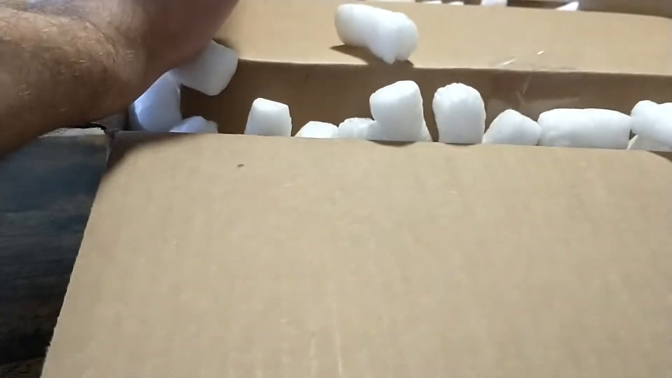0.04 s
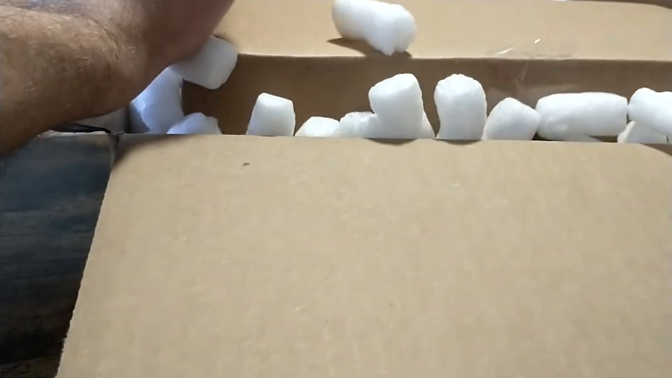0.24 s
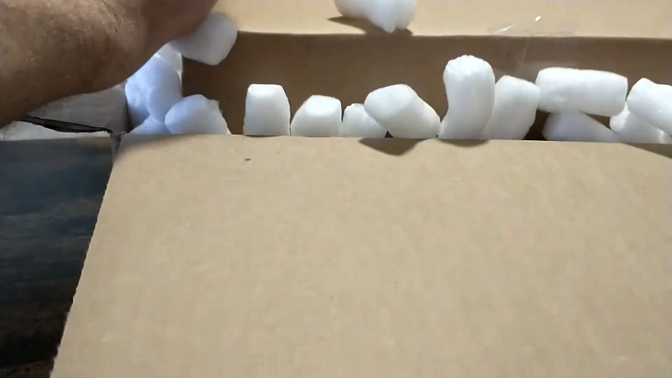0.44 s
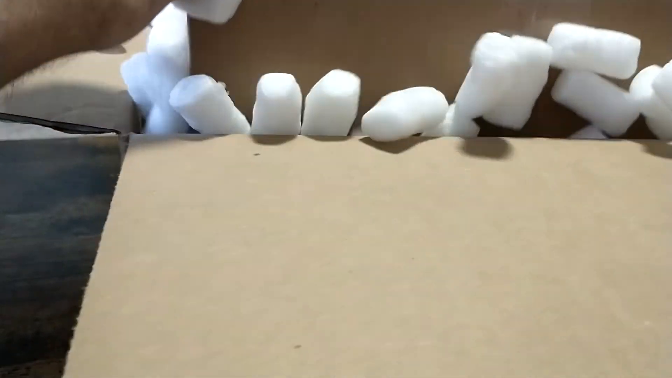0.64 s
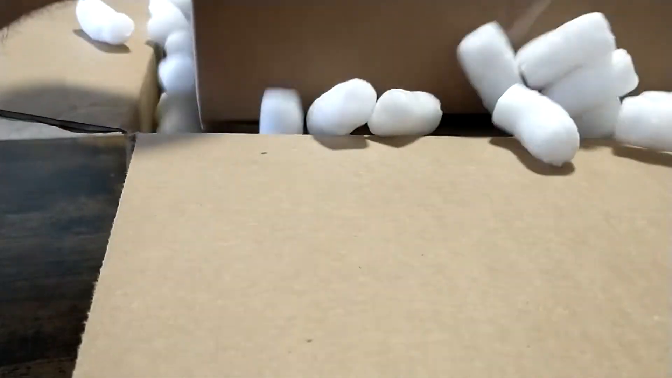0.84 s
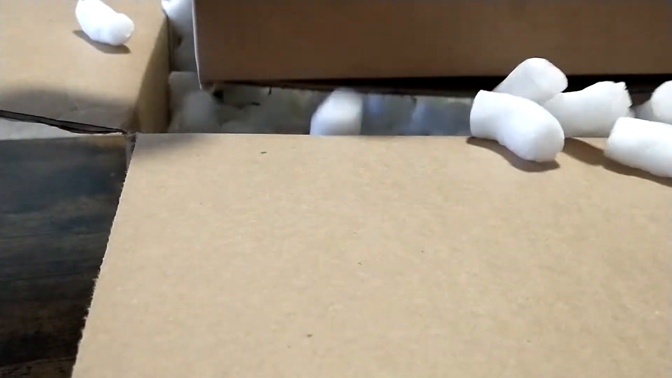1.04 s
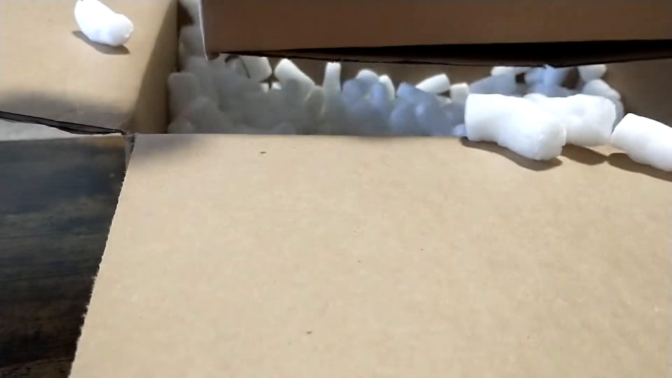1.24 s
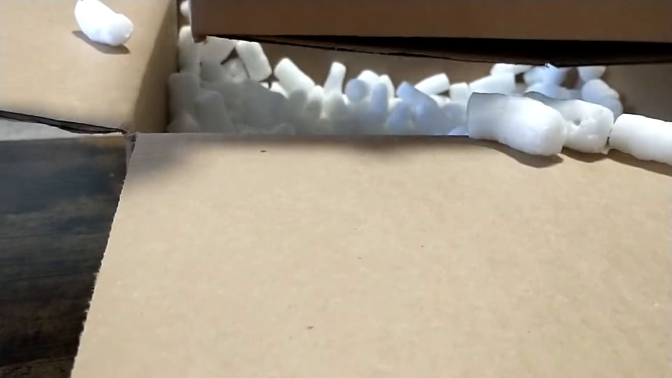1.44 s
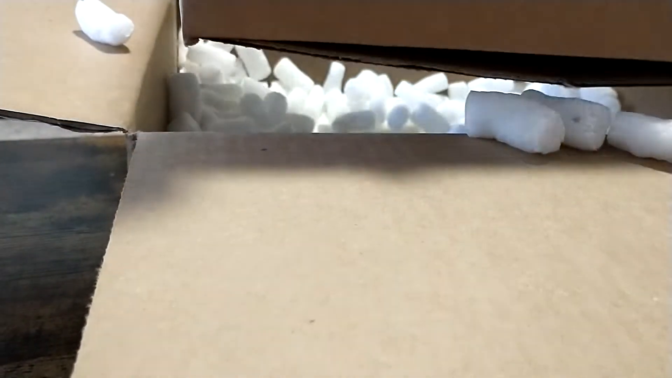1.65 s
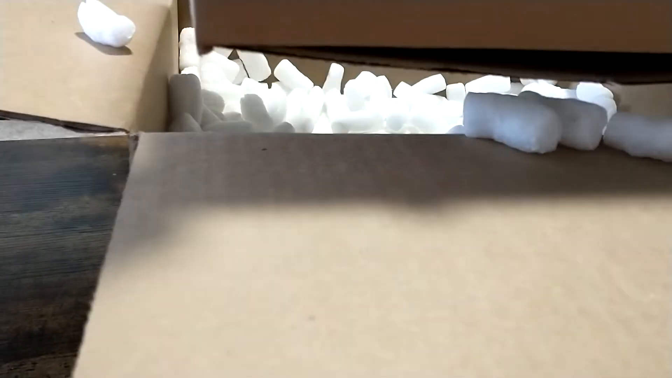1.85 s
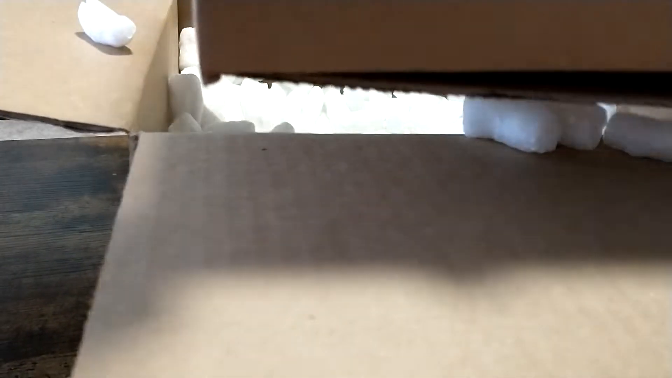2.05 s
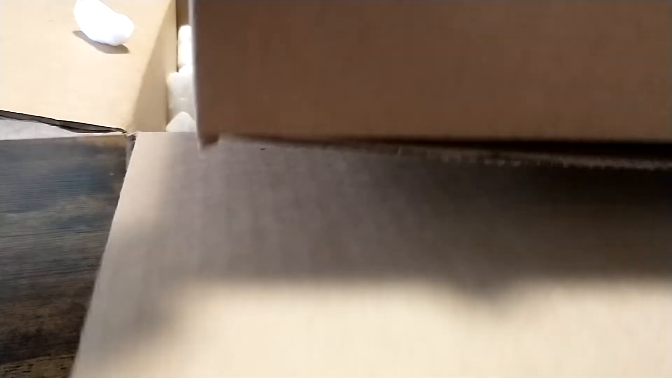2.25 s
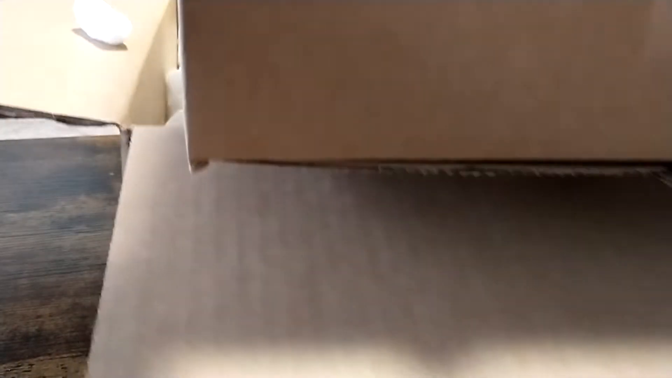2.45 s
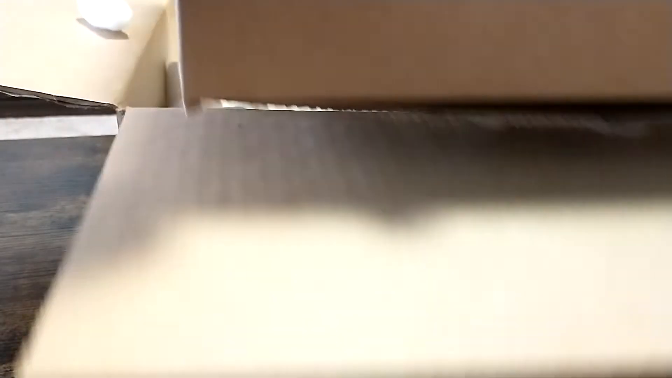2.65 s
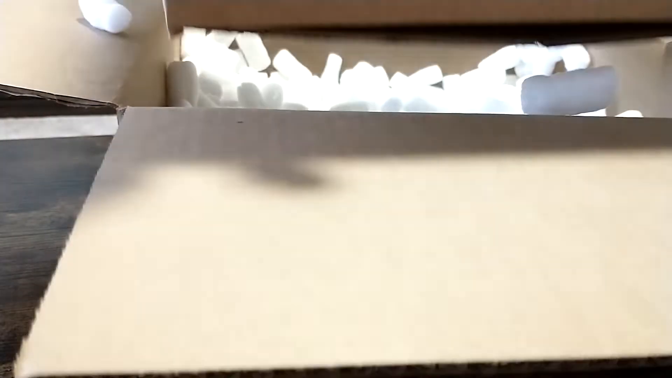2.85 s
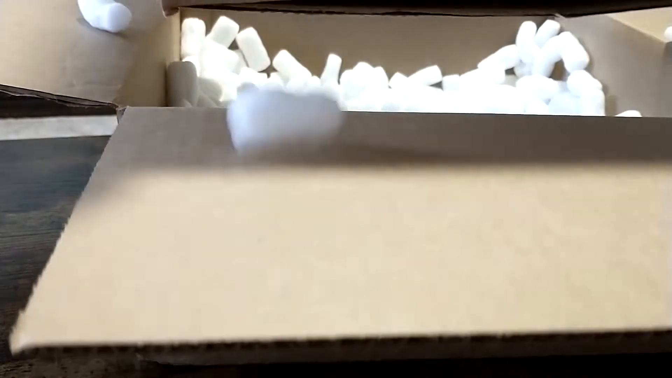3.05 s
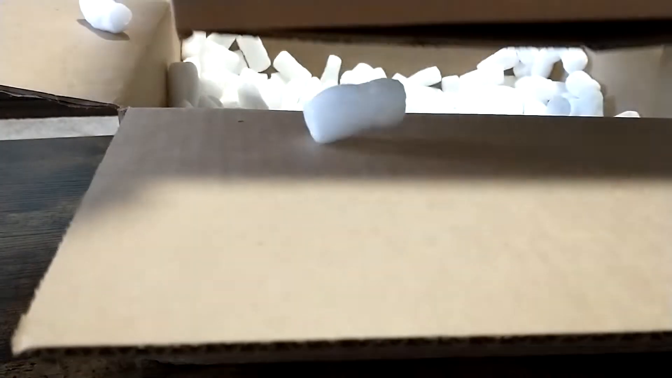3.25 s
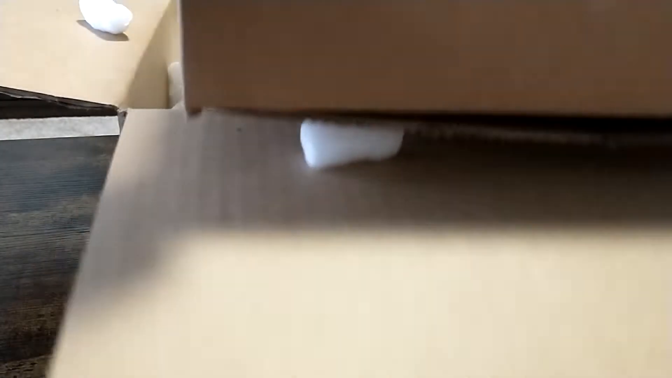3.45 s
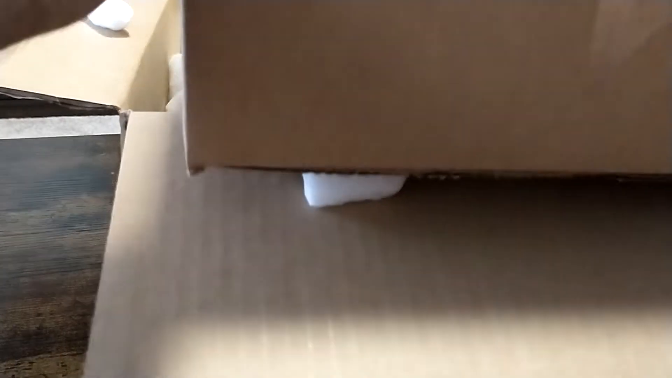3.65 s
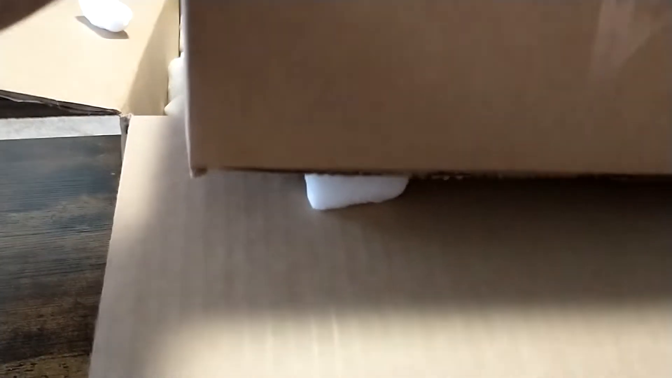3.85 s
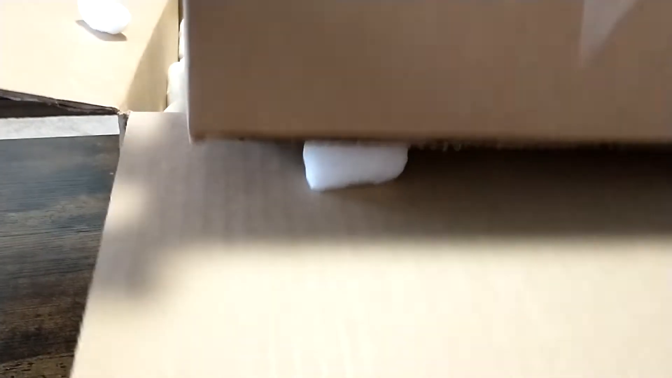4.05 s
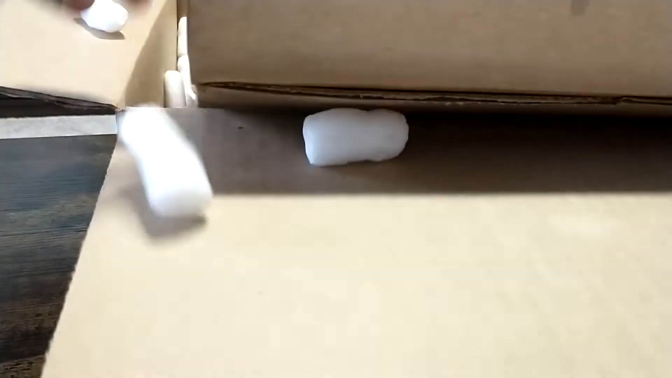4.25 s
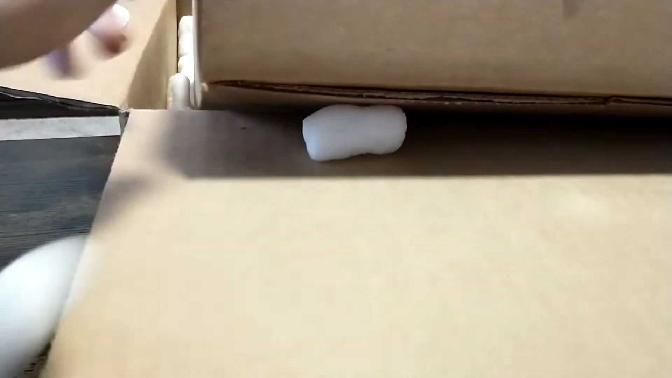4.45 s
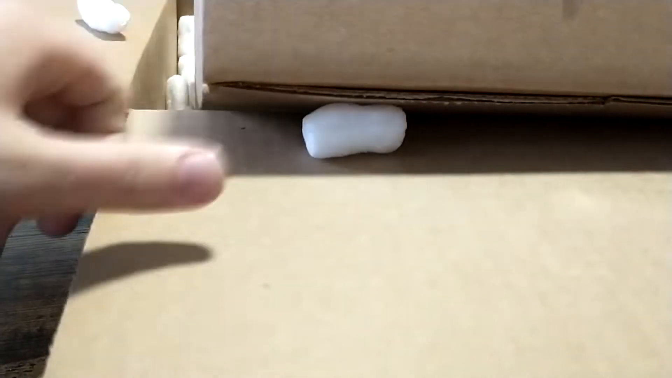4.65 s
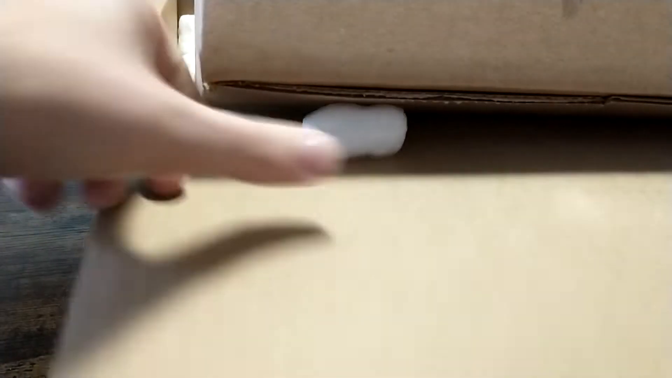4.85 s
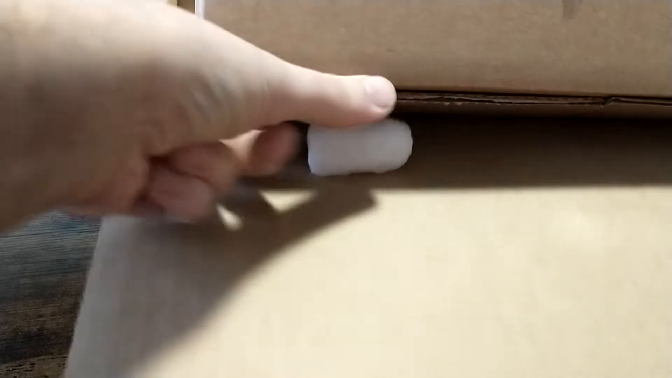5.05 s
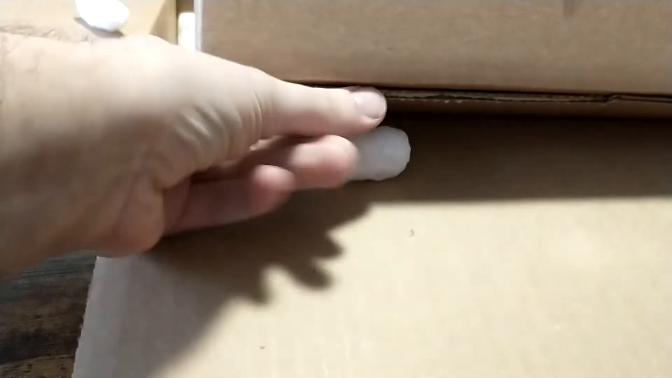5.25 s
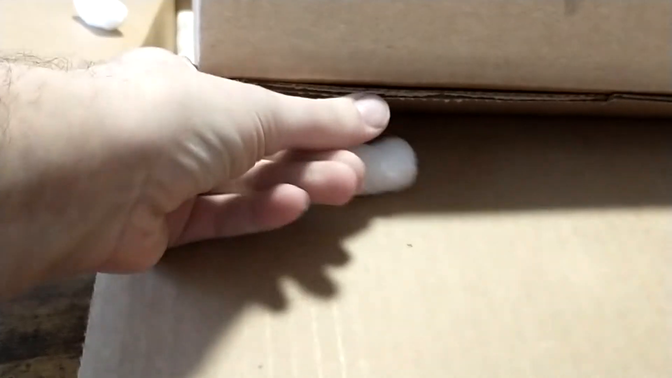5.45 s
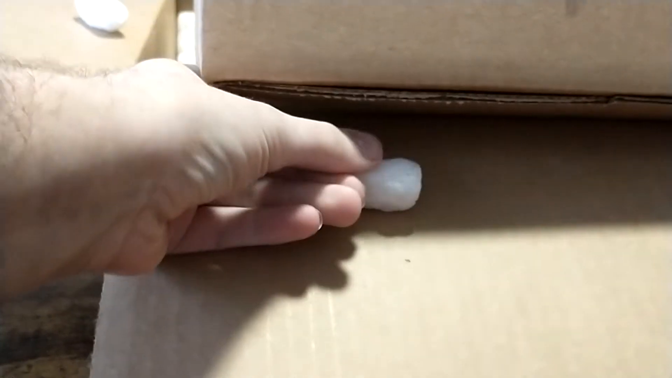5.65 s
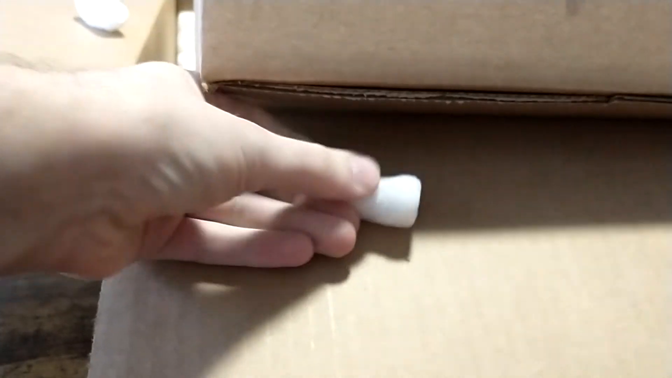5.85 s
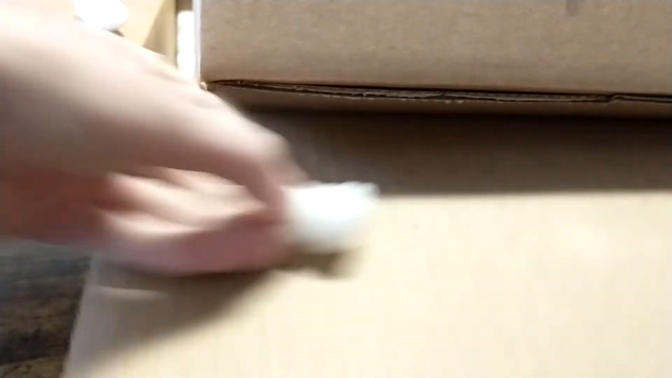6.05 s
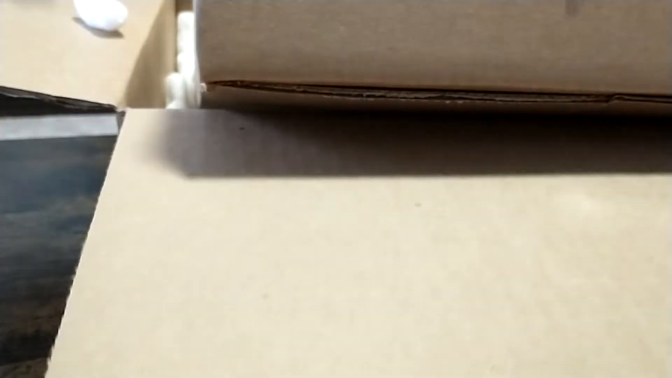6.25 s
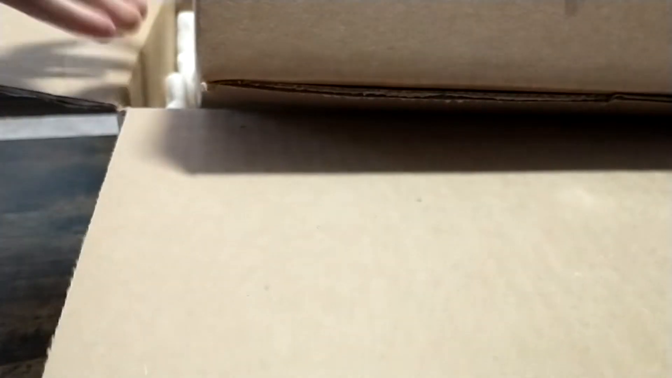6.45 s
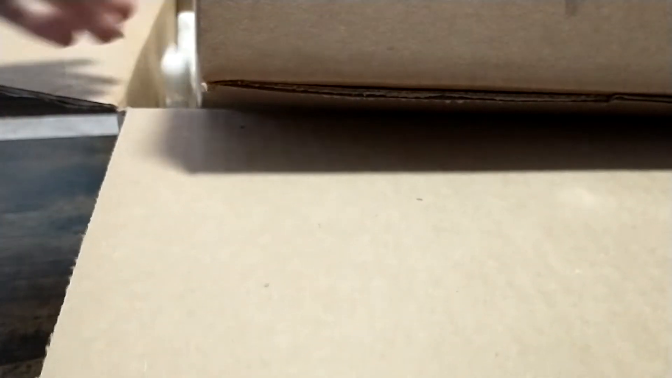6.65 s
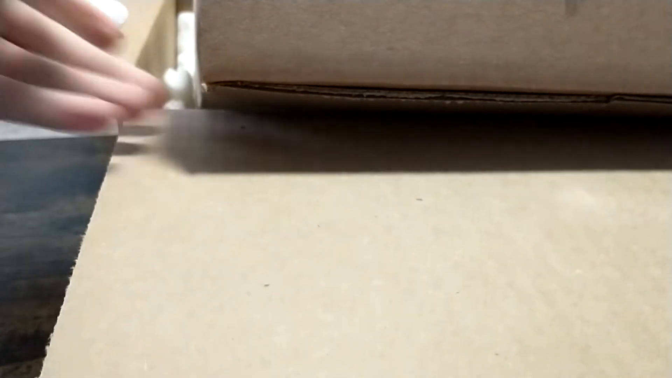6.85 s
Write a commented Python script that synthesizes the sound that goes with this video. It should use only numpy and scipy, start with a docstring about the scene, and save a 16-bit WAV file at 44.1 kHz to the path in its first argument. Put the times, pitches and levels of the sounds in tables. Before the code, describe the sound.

A cardboard carton is pulled from foam packing peanuts in a quiet room, heard close in stereo. A raspy scrape opens, then dull hollow knocks and light rustling. After a faint creaky lull come more bumps and a set-down, then scattered peanut ticks. The strongest burst is a stuttering foam rub with squeaks in the second half, followed by lighter taps, small squeaks and near silence.

```python
"""In a quiet room, a cardboard carton is lifted out of foam packing peanuts and set down on the outer box's flap.
Peanuts rustle, tick, creak and squeak: noise under a gate of tiny contacts, short bursts and noisy tones.
Card drags on card with a fibrous rasp, made from gated noise that is brighter when the rubbing is harder.
Each knock and bump shakes the card's panels, heard as dull drumming from ringing filters."""
import sys
import numpy as np
from scipy import signal
from scipy.fft import rfft, irfft
from scipy.io import wavfile

SR = 44100
rng = np.random.default_rng(int(sys.argv[2]) if len(sys.argv) > 2 else 0)


def persist_wave(psi):
    """Save psi, clipped to +-1, as 16-bit WAV."""
    counts = np.round(np.clip(psi, -1, 1) * 32767).astype(np.int16)
    wavfile.write(sys.argv[1], SR, np.atleast_2d(counts).T)


N = 304731

# All dB in the tables are levels going in; the filters that follow change them.
# Strokes of hand and carton. Each row: start of full force in seconds, rise, hold and fall in seconds,
# then foam, card fibre, panel and wall levels in dB.
STROKES = [(0.0, .05, 0.061, 0.079, -54.5, -46, -44, -42),
           (0.222, 0.075, 0.23, 0.61, -62.5, -58, -51.5, -54),
           (0.497, 0.43, 0.065, 0.42, -62.5, -48, -49.5, -57.5),
           (0.645, 0.28, 0.021, 0.4, -49.5, -60, -52.5, -61), (0.968, 1, 0.3, 0.28, -62, -66.5, -62.5, -56),
           (2.198, 0.12, 0.039, 0.31, -66, -60.5, -54, -67.5),
           (2.454, 0.15, 0.023, 0.15, -49, -49, -48.5, -60.5),
           (2.664, 0.15, 0.026, 0.081, -51, -45, -47.5, -56.5),
           (2.719, 0.098, 0.042, 0.022, -41.5, -53, -71, -69),
           (3.542, 0.056, 0.02, 0.12, -66.5, -59.5, -70, -80),
           (3.652, 0.012, 0.1, 0.089, -65, -57, -59, -52),
           (3.72, 0.036, 0.16, 0.05, -56.5, -85, -64.5, -86),
           (4.1, 0.81, 0.077, 0.11, -58, -68, -71.5, -69),
           (4.388, 0.18, 0.11, 0.11, -39.5, -49.5, -47, -43),
           (4.548, 0.068, 0.087, 0.061, -57.5, -55.5, -54.5, -45),
           (4.972, 0.7, 0.16, 0.11, -63, -69, -67, -66),
           (5.307, 0.32, 0.079, 0.095, -65.5, -61.5, -63.5, -63.5),
           (5.658, 0.12, 0.016, 0.053, -73, -62.5, -68, -75),
           (5.875, 0.04, 0.025, 0.33, -60, -62, -71, -77),
           (5.992, 0.097, 0.016, 0.12, -53.5, -65, -68, -73),
           (6.119, 0.097, 0.047, 0.035, -55, -66, -72, -73),
           (6.192, 0.012, 0.025, 0.031, -45.5, -63, -89, -77),
           (6.576, 0.26, 0.018, 0.06, -67, -98, -102, -96)]
# Faint stirring between strokes: foam, card fibre, panel and wall levels in dB.
AT_REST_DB = [-73.5, -82, -85.5, -79.5]
SWING_DB = 20   # gained over each rise time, lost over each fall time
TOUCH_S = 0.001   # a rubbing contact builds up over this time

# Knocks on the card. Each row: start in seconds, then panel, wall, bright crack and papery slap levels in dB.
KNOCKS = [(0.182, -41, -44.5, -48, -62), (0.744, -28.5, -42, -56, -40), (1.149, -35, -39.5, -37.5, -46),
          (1.567, -34, -48, -47, -47), (1.793, -43, -52, -47, -47), (2.61, -34.5, -48, -51, -61),
          (3.1558, -36.5, -56.5, -40, -45), (3.248, -38.5, -53, -49, -53), (3.298, -44, -72, -56, -60),
          (3.534, -42.5, -53.5, -49.5, -46.5), (3.994, -42, -61.5, -44, -56), (4.312, -35, -45.5, -56, -48),
          (4.742, -58.5, -43, -63, -45.5), (4.953, -55, -38, -41, -39), (5.313, -43, -50, -42.5, -45),
          (5.584, -36, -51, -36, -34.5)]
SETTLE_DB = -23.5   # the flaps' long after-rattle, relative to the knock
SLAP_TAIL_DB = -12.5   # the slap's papery tail, relative to its snap
# Soft bumps with no snap, only the card's own ring. Each row: start in seconds, panel and wall levels in dB.
BUMPS = [(0.831, -31.5, -38.5), (1.047, -55, -43.5), (1.577, -40, -50), (2.07, -43.5, -53),
         (2.101, -66, -52), (3.264, -43.5, -51), (3.345, -52, -57), (3.363, -50.5, -71), (2.899, -53, -58),
         (3.522, -49, -46), (3.678, -39.5, -41), (3.729, -38.5, -38.5), (4.179, -42.5, -45),
         (4.26, -41, -39.5), (4.359, -33, -41), (4.517, -40, -33.5), (6.822, -58, -54)]
BUMP_T60_S = 0.071   # time for a bump's push on the walls to fade by 60 dB

# The carton's panels. Each row: pitch in Hz, level in dB, time to fade by 60 dB in seconds.
PANEL_MODES = [(123.4, -7, 0.12), (174.1, -4, 0.16), (202.4, 1, 0.055), (260.2, -0.5, 0.044),
               (309, -12.5, 0.017), (614, -14.5, 0.6), (727, -1.5, 0.017), (829, 0.5, 0.011)]
# The panel that rings only until the carton rests on it: pitch in Hz, level in dB, 60 dB fade in seconds.
FREE_PANEL = (459, -5.5, 0.057)
SET_DOWN_S = 3.3
# The card hardly rings between walls and flaps: lower and upper edge of this gap in Hz.
GAP_HZ = [420.6, 528.6]
WALL_TOP_HZ, FLAP_TOP_HZ = 520, 1170   # walls drive the modes below the first; panels weaken above the second

# Tone colour of the foam. Each row: frequency in Hz, relative level in dB.
FOAM_COLOUR = [(1500, -11.5), (3500, -0.5), (5500, -1.5), (7800, 0.5), (10000, -4.5), (12000, -14.5),
               (15500, -16.5)]
BRIGHT_HZ, BRIGHT_PER_DB = 6900, 0.1421   # treble above this gains this many dB per dB of harder rubbing
JUDDER_PEAK_S, JUDDER_GAP_S, JUDDER_DB = 4.412, 0.0318, 4   # the hardest stroke stutters up and down
# Lone peanuts ticking. Each row: start in seconds, level in dB.
TICKS = [(1.704, -47), (1.7727, -49), (1.9786, -52), (2.0326, -48.5), (3.335, -55), (3.346, -52),
         (6.29, -48), (6.304, -55), (2.22, -51), (3.77, -32.5), (3.824, -41), (3.956, -36), (4.205, -34),
         (4.732, -46), (4.874, -38), (6.0832, -39.5), (6.435, -49), (6.5061, -44), (6.623, -51)]
# Slow creaks as foam sticks and slips against the card. Each row: start and end in seconds, level in dB.
CREAKS = [(1.727, 2.195, -60)]
# Pitches in Hz at which a slipping peanut rings.
PEANUT_HZ = [2800, 6100, 8150]
PEANUT_T60_S, SLIP_GAP_S = 0.0017, 0.014   # the peanut's 60 dB fade; the typical gap between slips
# Pressed foam and card sing as they slide. Each row: start and end in seconds, pitch in Hz, level in dB.
SQUEAKS = [(2.1, 2.36, 6300, -59), (2.15, 2.552, 810, -56), (4.31, 4.604, 2300, -44),
           (4.343, 4.65, 9800, -49.5), (5.875, 5.955, 2010, -52.5), (5.955, 6.018, 3700, -50.5),
           (6.187, 6.23, 6300, -59), (6.61, 6.618, 4200, -43), (4.358, 4.4, 620, -44),
           (4.956, 5.16, 635, -57), (4.955, 5.005, 2150, -47)]

# Tone colour of the dragged card. Each row: frequency in Hz, relative level in dB.
CARD_COLOUR = [(500, -22), (1100, -2), (2200, 2), (3500, -7), (5500, -18), (12000, -58)]
RASP_TOP_HZ, FULL_RASP_DB = 2530, -57   # drags lighter than this level lose some of what lies above this pitch

# Tone colour of the quiet room. Each row: frequency in Hz, relative level in dB.
ROOM_COLOUR = [(30, -3.5), (259, -7), (486, -10), (649, -15), (1220, -33), (8080, -39), (16000, -37)]
ROOM_DB = -71
# How alike left and right are. Each row: frequency in Hz, likeness (1 same, 0 unrelated, below 0 opposed).
LIKENESS = [(60, 1), (380, 0.93), (2380, -0.07), (15000, -0.033)]
# Balance of the two sides. Each row: frequency in Hz, left over right in dB.
LEFT_LEAD = [(60, -1), (380, -1), (2380, 1), (15000, -5)]
MIC_BASS_HZ, TOP_CUT_HZ = 89, 16350   # bass thins out below the first; the top is 60 dB down from the second


def from_db(db):
    """Turn a level in dB into a multiplier."""
    return 10 ** (np.asarray(db) / 20)


def rms_one(x):
    """Scale a sound to an average strength (rms) of one."""
    return x / np.sqrt(np.mean(x ** 2) + 1e-20)


def at_hz(points, hz):
    """Read between the rows of a frequency table, with pitch on a log scale."""
    table = np.array(points)
    return np.interp(np.log(hz), np.log(table[:, 0]), table[:, 1])


def butter(x, order, hz, kind="low"):
    """Pass a sound through a plain filter."""
    return signal.sosfilt(signal.butter(order, hz, kind, fs=SR, output="sos"), x)


def butter_in_step(x, order, hz, kind="low"):
    """Filter forwards and backwards, so that the result stays in step with the input."""
    return signal.sosfiltfilt(signal.butter(order, hz, kind, fs=SR, output="sos"), x)


def shaped(x, db_at, size=2048):
    """Filter to a wanted level at each frequency, with no sound ahead of its cause (minimum phase)."""
    cepstrum = irfft(np.log(from_db(db_at(np.fft.rfftfreq(size, 1 / SR) + 1))))
    # folding the second half onto the first gives minimum phase
    cepstrum[1:size // 2] *= 2
    cepstrum[size // 2 + 1:] = 0
    response = irfft(np.exp(rfft(cepstrum)))
    return signal.oaconvolve(np.atleast_2d(x), response[None], axes=1)[:, :N]


def coloured(x, spectrum):
    """Give a sound a tone colour, keeping the strength that white noise would have."""
    power = np.mean(from_db(at_hz(spectrum, np.linspace(1, SR / 2, 999))) ** 2)
    return shaped(x, lambda hz: at_hz(spectrum, hz)) / np.sqrt(power)


def fading(x, time_s):
    """Let each impulse fade smoothly, to about a third in the given time."""
    return signal.lfilter([1], [1, -np.exp(-1 / (time_s * SR))], x)


def ring(x, hz, t60):
    """Ring like a struck panel: a click sets off a fading tone, and a steady push gives none."""
    radius = from_db(-60 / (t60 * SR))
    angle = 2 * np.pi * hz / SR
    return signal.lfilter([.5, 0, -.5], [1, -2 * radius * np.cos(angle), radius * radius], x + 1e-18)


def ring_mode(push, hz, level_db, t60):
    """Ring one panel mode, evened out so that long rings do not outweigh short ones."""
    return from_db(level_db) * ring(push, hz, t60) / np.sqrt(t60 * SR / 14)


def contacts(level_db, per_s, spread_db, length_s, bed):
    """Rub: small uneven contacts gate two unrelated noises; hard rubbing blurs them into a smooth bed."""
    sizes = from_db(spread_db * np.minimum(rng.exponential(1, N), 3.2))
    hits = sizes * (rng.random(N) < per_s / SR)
    gate = fading(fading(hits, length_s), TOUCH_S)
    blur = bed * from_db(0.54 * (level_db + 58.0))
    envelope = (blur + rms_one(gate)) / np.sqrt(1 + blur ** 2)
    return from_db(level_db) * envelope * rng.standard_normal((2, N))


def bursts(seconds, level_db, t60):
    """Strike: at each time, noise starts suddenly and dies away."""
    gate = np.zeros(N)
    gate[np.round(seconds * SR).astype(int)] = from_db(level_db)
    gate = signal.lfilter([1], [1, -from_db(-60 / (t60 * SR))], gate + 1e-18)
    # soft materials take about a millisecond to meet
    gate = signal.lfilter([1 / 30], [1, 1 / 30 - 1], gate)
    return gate * rng.standard_normal((2, N))


def room_floor():
    """The quiet room is steady noise with a tone colour of its own."""
    return from_db(ROOM_DB) * coloured(rng.standard_normal((2, N)), ROOM_COLOUR)


def effort():
    """Rubbing levels in dB of the four layers: every stroke swells, holds and lets go; powers add."""
    t = np.arange(0, N, 32) / SR
    power = from_db(AT_REST_DB)[:, None] ** 2
    for s, rise, hold, fall, *levels_db in STROKES:
        away = np.maximum((s - t) / rise, 0) + np.maximum((t - s - hold) / fall, 0)
        power = power + from_db(np.array(levels_db)[:, None] - SWING_DB * away) ** 2
    return [np.interp(np.arange(N) / SR, t, 10 * np.log10(p)) for p in power]


def rustle(foam_db):
    """Peanuts rub, brighter under force, creak and tick; each knock adds a short bright crack."""
    rub = judder(contacts(foam_db, per_s=400, spread_db=14.5, length_s=0.0029, bed=3.2))
    top = butter_in_step(rub, 2, BRIGHT_HZ, "high")
    rub += top * (from_db(BRIGHT_PER_DB * (foam_db - np.mean(foam_db))) - 1)
    s, _, _, crack_db, _ = np.transpose(KNOCKS)
    cracks = bursts(s, crack_db, 0.02)
    ticks = bursts(*np.transpose(TICKS), 0.011)
    return coloured(rub + creak() + cracks + ticks, FOAM_COLOUR)


def scrape(fibre_db):
    """Fibres catch as card drags on card, brighter under force; a knock adds a papery slap with a short tail."""
    rub = contacts(fibre_db, per_s=270, spread_db=4.5, length_s=0.0025, bed=1.8)
    dull = butter_in_step(rub, 4, RASP_TOP_HZ)
    rub = dull + (rub - dull) * from_db(.5 * np.minimum(fibre_db - FULL_RASP_DB, 0))
    s, *_, slap_db = np.transpose(KNOCKS)
    slaps = bursts(s, slap_db, 0.023) + bursts(s, slap_db + SLAP_TAIL_DB, 0.13)
    return coloured(rub + slaps, CARD_COLOUR)


def panels(panel_db, wall_db):
    """Drags, knocks and bumps set panels ringing: thick walls at low pitches, thin flaps at higher ones."""
    walls = contacts(wall_db, per_s=90, spread_db=5.0, length_s=0.012, bed=1.7)
    flaps = contacts(panel_db, per_s=100, spread_db=-1.0, length_s=0.002, bed=2.3)
    s, knock_db, thud_db, *_ = np.transpose(KNOCKS)
    walls += bursts(s, thud_db, 0.17)
    # a knock is a short rattle, then the card settles
    flaps += bursts(s, knock_db, 0.037) + bursts(s, knock_db + SETTLE_DB, 0.59)
    s, knock_db, thud_db = np.transpose(BUMPS)
    flaps += bursts(s, knock_db, 0.04)
    walls += bursts(s, thud_db, BUMP_T60_S)

    body = 0
    for hz, level_db, t60 in PANEL_MODES:
        push = walls if hz < WALL_TOP_HZ else flaps
        body = body + ring_mode(push, hz, level_db, t60)
    body = butter(body, 2, GAP_HZ, "stop")
    before_rest = np.arange(N) < SET_DOWN_S * SR
    body += ring_mode(flaps * before_rest, *FREE_PANEL)
    return butter(body, 2, FLAP_TOP_HZ)


def patchy(x, depth_db, step_s):
    """Half-octave bands swell and fade on their own as the rubbing spots change."""
    edges = 900 * 2 ** (np.arange(10) / 2)
    out, chance = 0, rng.standard_normal((9, 200))
    for k in range(9):
        wander = np.interp(np.arange(N) / SR / step_s, np.arange(200), chance[k])
        band = butter(x, 2, edges[k:k + 2], "band")
        # neighbours meet in opposite phase
        out = out + (-1) ** k * from_db(depth_db * wander) * band
    return out


def creak():
    """Foam sticks and slips at uneven gaps; each slip is a very short burst that rings the peanut."""
    chance = rng.standard_normal((200, 2))
    s = np.cumsum(SLIP_GAP_S * np.exp(0.52 * chance[:, 0]))
    level_db = np.zeros(200)   # 0 marks a slip outside every creak
    for start, end, db in CREAKS:
        level_db += np.where((s > start) & (s < end), db + 4 * chance[:, 1], 0)
    inside = level_db < 0
    slips = bursts(s[inside], level_db[inside], 0.012)
    return sum(ring(slips, hz, PEANUT_T60_S) for hz in PEANUT_HZ) / 2


def squeeze():
    """Squeaks: slow noise carried on a tone that sags as the foam gives way; brief ones are broader."""
    out = np.zeros((2, N))
    for start, end, hz, db in SQUEAKS:
        at = round(start * SR)
        t = np.arange(round((end - start) * SR)) / SR
        width_hz = 0.036 * hz + 5.6 / (end - start)
        slow = rms_one(butter(rng.standard_normal((2, SR)), 2, width_hz))[:, :len(t)]
        tone = np.cos(2 * np.pi * hz * t * (1 - 0.05 * t))
        swell = signal.windows.tukey(len(t), .4)
        out[:, at:at + len(t)] += from_db(db) * swell * slow * tone
    return out


def judder(rub):
    """The hardest foam stroke stutters: its level swings evenly for a little over a fifth of a second."""
    since = np.arange(N) / SR - JUDDER_PEAK_S
    active = abs(since - 1 / 10) < 1 / 9
    return rub * from_db(JUDDER_DB * np.cos(2 * np.pi * since / JUDDER_GAP_S) * active)


def room(x):
    """The box and the walls return a short, scattered tail, made of fading noise."""
    t = np.arange(SR // 4) / SR
    tail = rng.standard_normal((2, len(t))) * from_db(-60 * t / 0.15) * (t > .003)
    return x + from_db(-36.0) * signal.fftconvolve(x, tail, axes=1)[:, :N]


def ports(pair):
    """Two microphone ports hear the bass alike and the treble each in its own way."""
    def alike(hz):
        return np.clip(at_hz(LIKENESS, hz), -.98, .98)

    mid = shaped(pair[0], lambda hz: 10 * np.log10((1 + alike(hz)) / 2))[0]
    side = shaped(pair[1], lambda hz: 10 * np.log10((1 - alike(hz)) / 2))[0]
    left = shaped(mid + side, lambda hz: at_hz(LEFT_LEAD, hz) / 2)
    right = shaped(mid - side, lambda hz: -at_hz(LEFT_LEAD, hz) / 2)
    return np.vstack([left, right])


def scene():
    """Foam, card and panels sound in the room, over its quiet floor."""
    foam_db, fibre_db, panel_db, wall_db = effort()
    friction = patchy(rustle(foam_db) + scrape(fibre_db), depth_db=3.5, step_s=.09)
    box = friction + panels(panel_db, wall_db) + squeeze()
    return ports(room(box) + room_floor())


def record(dry):
    """The microphone thins out the bass, and the very top is cut."""
    dry = butter(dry, 1, MIC_BASS_HZ, "high")
    return signal.sosfilt(signal.cheby2(14, 60, TOP_CUT_HZ, fs=SR, output="sos"), dry)


dry = scene()
out = record(dry)
persist_wave(out)
```